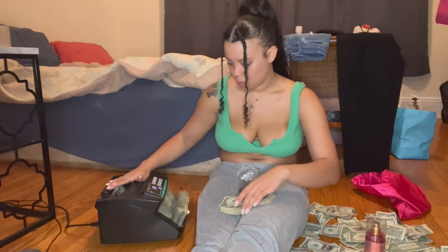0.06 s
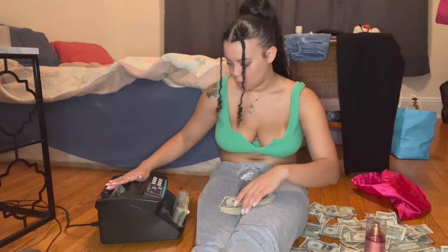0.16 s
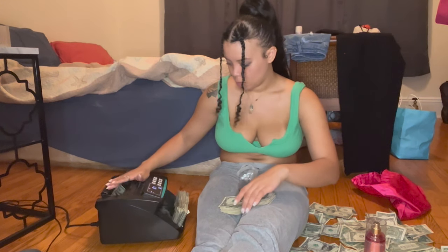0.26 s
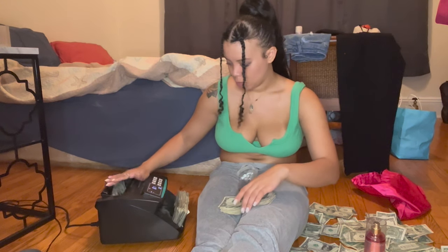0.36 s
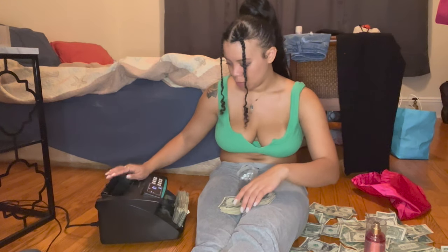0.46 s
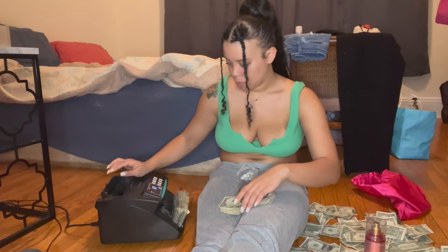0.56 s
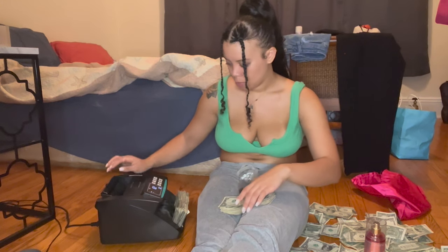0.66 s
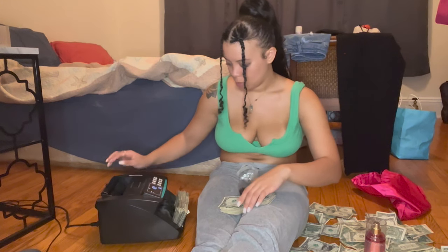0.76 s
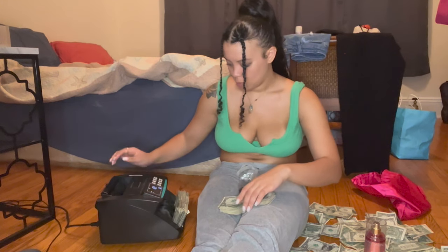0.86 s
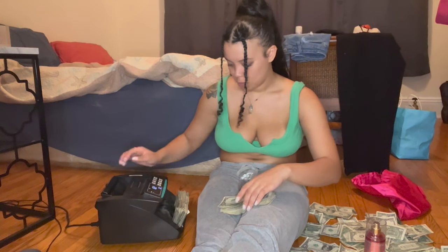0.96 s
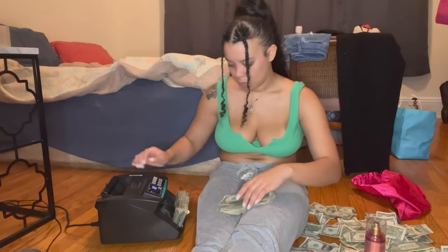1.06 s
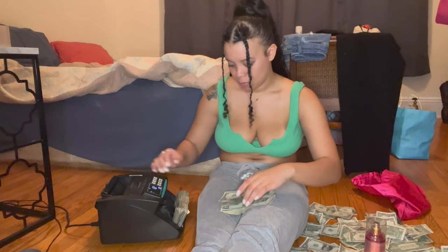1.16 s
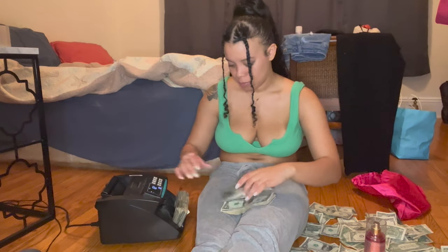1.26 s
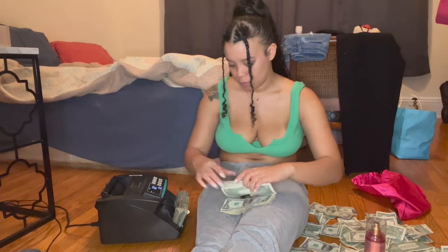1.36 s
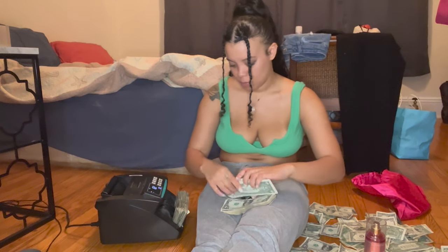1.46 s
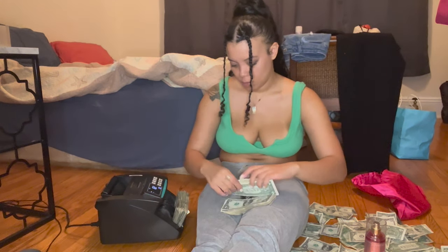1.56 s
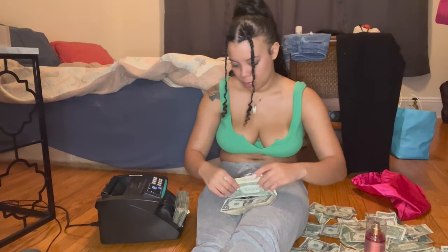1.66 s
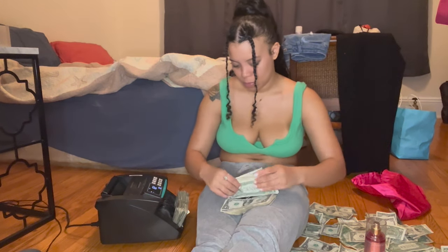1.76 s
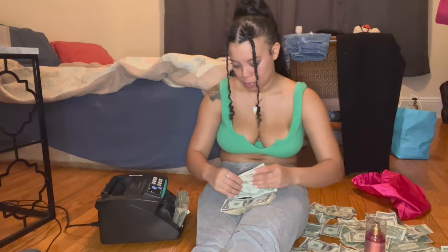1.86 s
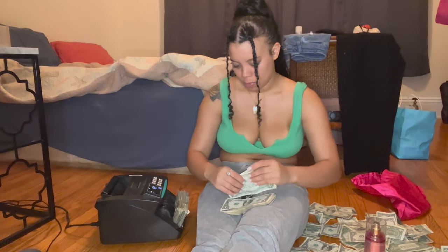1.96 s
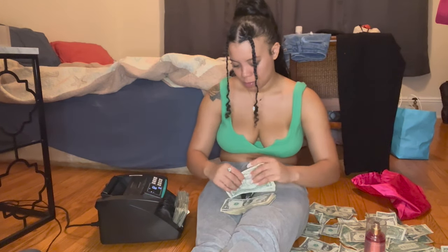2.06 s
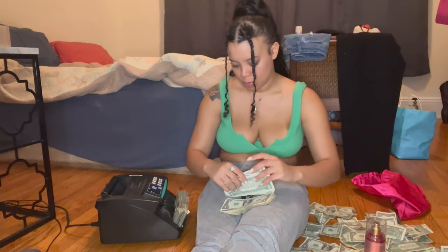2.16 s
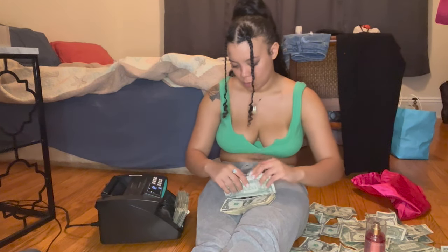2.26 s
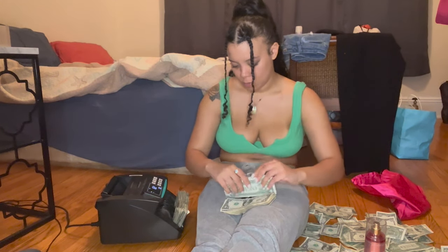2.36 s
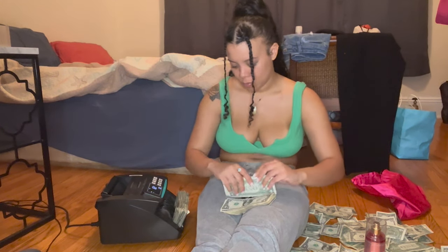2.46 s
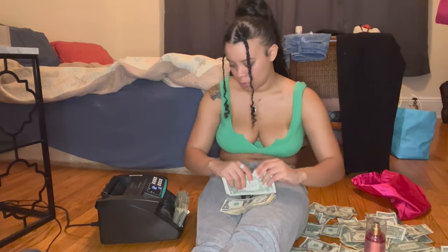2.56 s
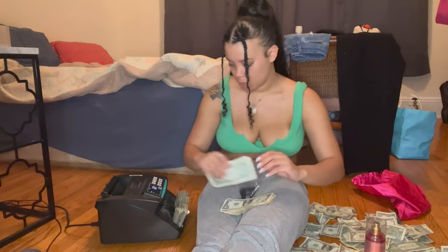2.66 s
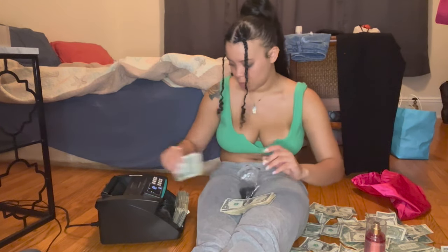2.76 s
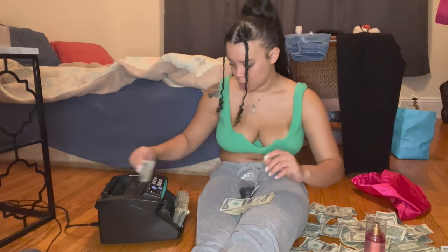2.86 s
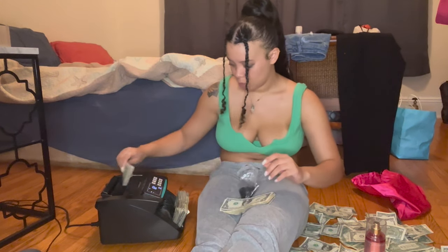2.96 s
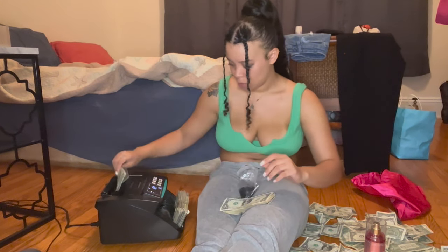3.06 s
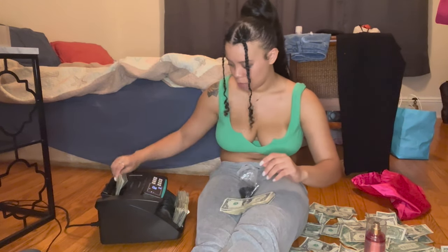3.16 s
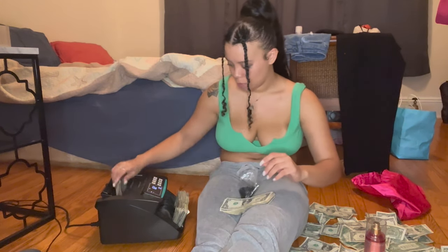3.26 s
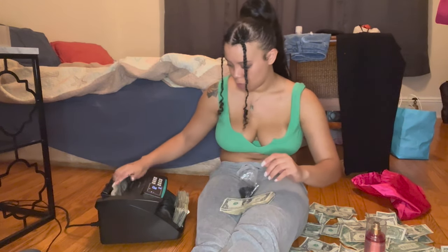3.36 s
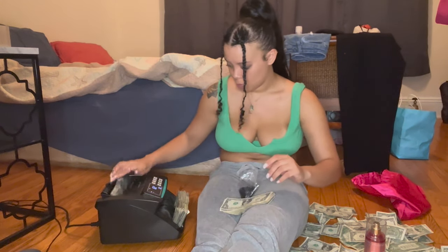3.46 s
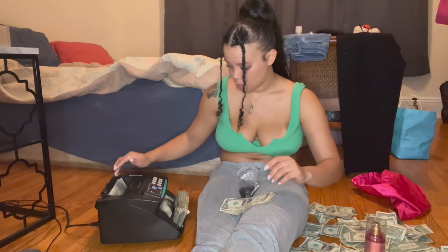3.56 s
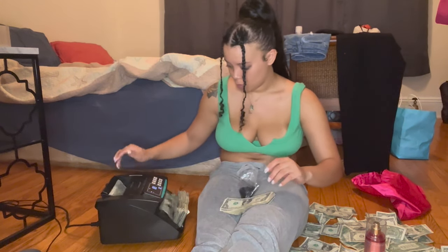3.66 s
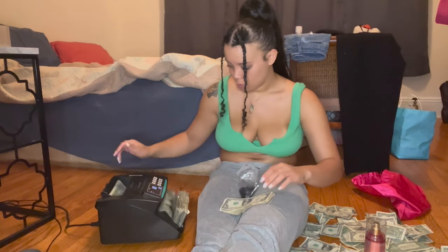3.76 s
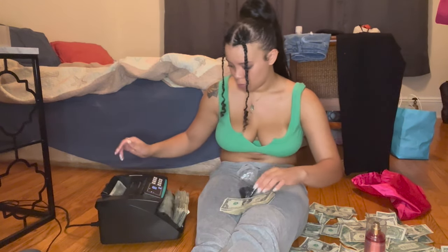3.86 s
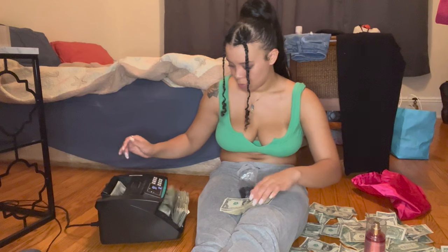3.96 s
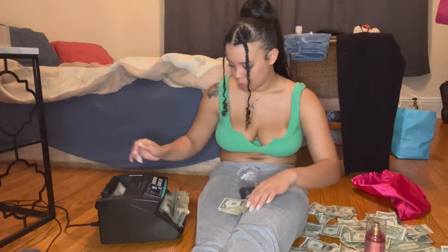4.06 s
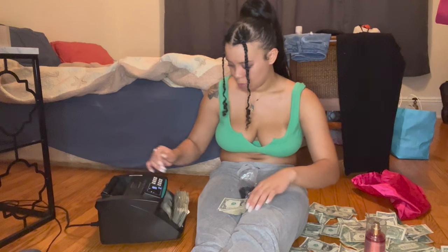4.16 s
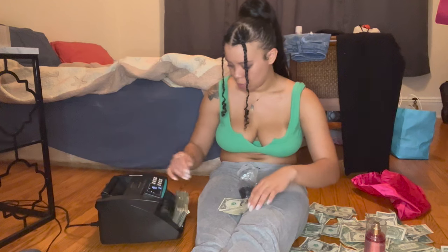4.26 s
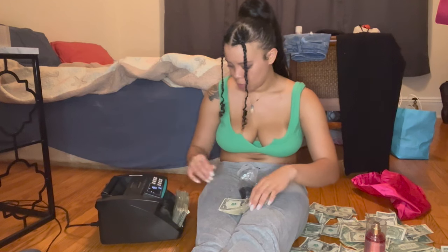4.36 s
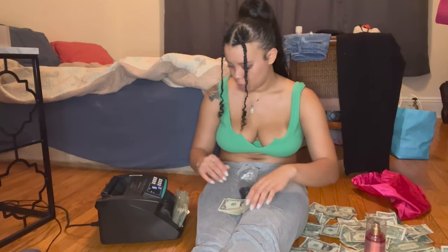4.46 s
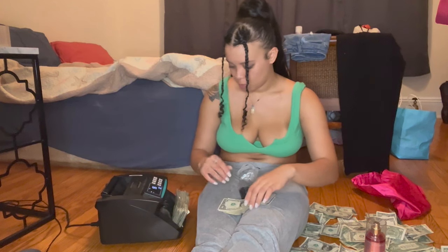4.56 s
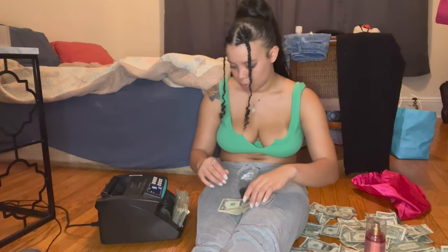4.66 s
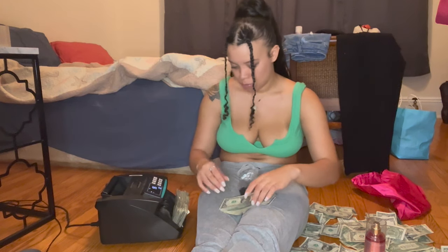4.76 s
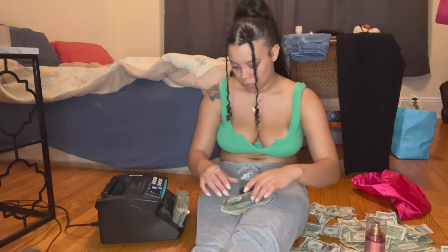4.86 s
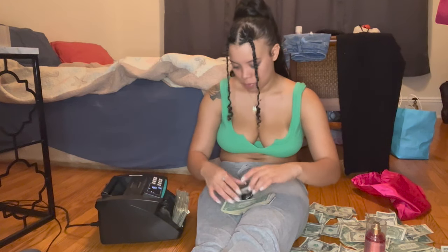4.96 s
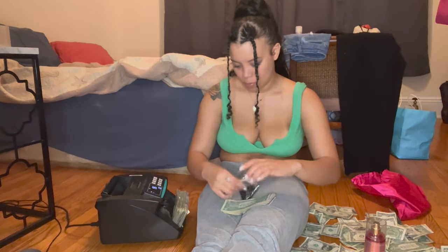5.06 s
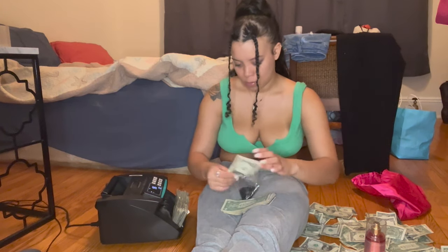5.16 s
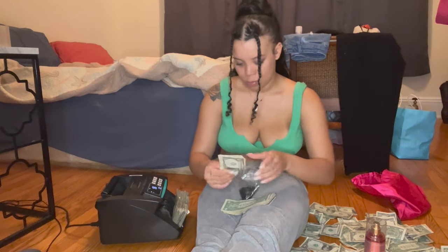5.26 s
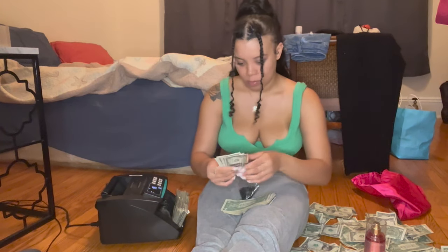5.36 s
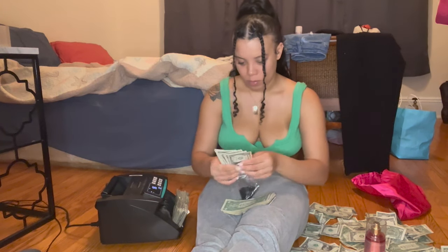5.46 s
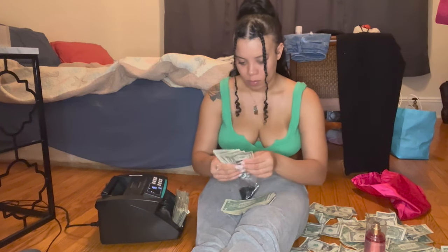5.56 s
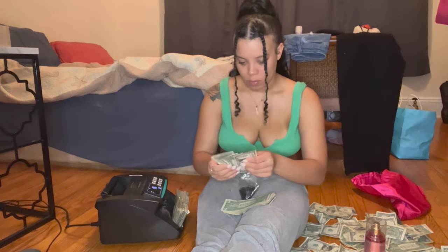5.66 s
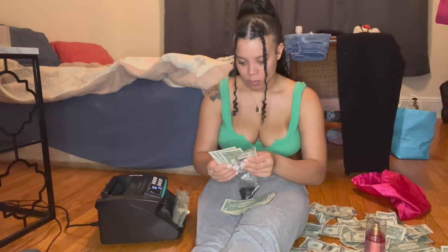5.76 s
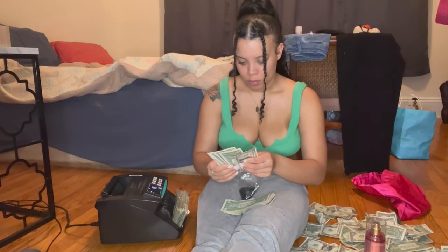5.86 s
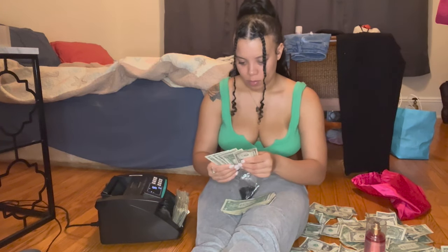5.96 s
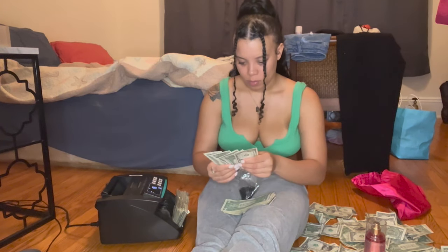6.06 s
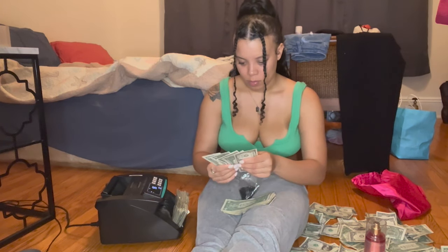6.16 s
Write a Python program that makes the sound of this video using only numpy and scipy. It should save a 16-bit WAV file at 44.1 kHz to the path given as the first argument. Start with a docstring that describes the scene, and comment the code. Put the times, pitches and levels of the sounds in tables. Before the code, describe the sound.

Close in a bedroom, a bill counting machine whirs in two short bursts, with soft paper rustles, crisp snaps and a hopper clack between them.

```python
"""A banknote counter, already running, hums and drones close by on a wooden bedroom floor.
Rollers flick notes through at about 22 a second as scrapes and snaps; a vaned stacker wheel flaps them.
After the brake, hands on the other side gather, square and fan notes: clumps of tiny slips and sharp pops.
The stack clacks in the hopper, the machine runs once more, and hands return over the low floor rumble."""
import sys
import numpy as np
from scipy import signal
from scipy.fft import rfft, irfft
from scipy.io import wavfile

SR = 44100
rng = np.random.default_rng(int(sys.argv[2]) if len(sys.argv) > 2 else 0)


def file_out(sig):
    """Save sig as 16-bit WAV at sys.argv[1]."""
    # one column per channel
    cols = np.atleast_2d(sig).T
    # limit, then scale
    lim = np.clip(cols, -1, 1)
    pcm = np.round(lim * 32767).astype(np.int16)
    wavfile.write(sys.argv[1], SR, pcm)


N = 274302
T = np.arange(N) / SR


def amp(db):
    """Decibels to gain."""
    return 10 ** (np.asarray(db) / 20)


def evened(x):
    """Scales to rms 1."""
    return x / np.sqrt(np.mean(x ** 2) + 1e-20)


def read(points, hz):
    """Reads a spectrum on a log-frequency axis."""
    f, value = np.transpose(points)
    return np.interp(np.log(hz + 1), np.log(f + 1), value)


def add(mix, s, sound):
    """Mixes a sound in at time s."""
    part = mix[max(round(s * SR), 0):][:len(sound)]
    part += sound[:len(part)]


def colour(x, points):
    """Causal minimum-phase filter of unit energy; its response stays level above 11 kHz."""
    hz = np.minimum(abs(np.fft.fftfreq(4096, 1 / SR)), 11000)
    log_gain = np.log(amp(read(points, hz)))
    response = np.exp(np.conj(signal.hilbert(log_gain)))
    taps = np.fft.ifft(response).real
    return signal.oaconvolve(x, taps / np.linalg.norm(taps))[:len(x)]


def wander(hz):
    """Slow chance of rms 1, mostly below the given rate."""
    lowpass = np.exp(-(np.fft.rfftfreq(N, 1 / SR) / hz) ** 2)
    return evened(irfft(rfft(rng.standard_normal(N)) * lowpass, N))


def crackle(per_s, spread_db):
    """Random clicks of either sign, many small and a few large, at rms 1."""
    size = amp(spread_db * np.minimum(rng.exponential(1, N), 4))
    sign = rng.choice([-1, 1], N)
    return evened(size * sign * (rng.random(N) < per_s / SR))


SWELL_CURVE = 1.37  # 1 = straight in dB, 2 = bell


def swell(start, stop, rise_s, fall_s):
    """Full level from start to stop; 20 dB lower rise_s before and fall_s after."""
    away = np.maximum(start - T, 0) / rise_s + np.maximum(T - stop, 0) / fall_s
    return amp(-20 * np.minimum(away ** SWELL_CURVE, 10))


def burst(length, hz, db):
    """A tone that swells and dies within the given seconds."""
    t = np.arange(int(length * SR)) / SR
    return amp(db) * np.hanning(len(t)) * np.sin(2 * np.pi * hz * t)


def ring(modes):
    """The free ringing of a struck part: decaying sines."""
    t = np.arange(SR // 3) / SR
    return sum(amp(db - 60 * t / t60) * np.sin(2 * np.pi * hz * t) for hz, db, t60 in modes)


# Decay of the bedroom. Each row: frequency in Hz, time to die by 60 dB in seconds.
ROOM_DECAY = [(150, 0.5), (600, 0.32), (2000, 0.28), (6000, 0.31), (12000, 0.22)]


def reflections(x):
    """Scattered echoes for two sides that die away band by band."""
    delay = np.arange(SR) / SR
    taps = rng.standard_normal((2, SR)) * (rng.random((2, SR)) < .08) * (delay > .003)
    hz, t, z = signal.stft(taps, SR, nperseg=256)
    decay = amp(-60 * t / read(ROOM_DECAY, hz)[:, None])
    tail = signal.istft(z * decay, SR, nperseg=256)[1]
    # floor and furniture answer first
    tail *= 1 + 1.5 * np.exp(-np.arange(tail.shape[1]) / SR / 0.008)
    return signal.fftconvolve(x[None], tail / np.linalg.norm(tail[0]), axes=1)[:, :N]


def room(x, wet_db, lag):
    """Direct sound, lag s later on the right, plus four echo patterns that trade places at 13 Hz."""
    wet = sum(reflections(x * np.cos(2 * np.pi * (13 * T + k / 8))) for k in range(4)) / np.sqrt(2)
    direct = np.array([x, np.interp(T - lag, T, x)])
    return (direct + amp(wet_db) * wet) / np.sqrt(1 + amp(wet_db) ** 2 / 2)


# Spectrum of the faint room tone. Each row: frequency in Hz, relative level in dB.
AIR_COLOUR = [(53, -36), (90, -7), (125, -1), (153, -7), (261, -9), (341, -13.5), (409, -15), (492, -21.5),
              (856, -23.5), (1610, -32), (2530, -34), (5630, -41.5), (12000, -36.5), (15600, -68),
              (22000, -120)]
# Spectrum of the floor rumble. Each row: frequency in Hz, relative level in dB.
RUMBLE_COLOUR = [(20, -33), (32, -22.5), (45, -2), (62, 4), (80, -5.5), (110, -13.5), (300, -56.5)]
# Weight shifting on the floor. Each row: from and to in seconds, rumble level in dB.
SHIFTS = [(1.422, 2.95, -68), (4.55, 5.27, -64.5), (5.52, 6.222, -69)]
AIR_DB = -68.5
RUMBLE_DB, SHAKE_DB, RUMBLE_WAVER_DB = -69.5, -61, 2  # the house alone; floor shaken by the machine
SHAKE_HOLD_S = 0.22  # the floor goes on shaking after the brake
SHIFT_FADE_S, SHAKE_RISE_S, SHAKE_FADE_S = 0.1, .15, .25


def air():
    """Uneven floor rumble, alike on both sides, stirred by machine and movement; separate room tone."""
    shake = sum(swell(start, brake + SHAKE_HOLD_S, SHAKE_RISE_S, SHAKE_FADE_S) for start, brake, *_ in RUNS)
    shake = amp(SHAKE_DB) * shake
    shifts = sum(amp(db) * swell(start, stop, SHIFT_FADE_S, SHIFT_FADE_S) for start, stop, db in SHIFTS)
    level = np.sqrt(amp(RUMBLE_DB) ** 2 + shake ** 2 + shifts ** 2)
    stirred = level * amp(RUMBLE_WAVER_DB * wander(hz=7.4))
    rumble = stirred * colour(rng.standard_normal(N), RUMBLE_COLOUR)
    sides = np.array([colour(rng.standard_normal(N), AIR_COLOUR) for _ in range(2)])
    return rumble + amp(AIR_DB) * sides * amp(1.0 * wander(hz=4.6))


CRINKLE_DB, CRINKLE_LOW_HZ, CRINKLE_HIGH_HZ = -9.5, 970, 5900  # level is relative to the rustle


def crinkles(rustle):
    """Tiny creases give way as notes slide, each ringing for a few cycles at one of eight pitches."""
    out = np.zeros(N)
    for hz in np.geomspace(CRINKLE_LOW_HZ, CRINKLE_HIGH_HZ, 8):
        cycles = hz * np.arange(SR // 100) / SR
        ping = evened(np.exp(-cycles / 2) * np.sin(2 * np.pi * cycles))
        out += signal.oaconvolve(crackle(per_s=25, spread_db=2.5), ping)[:N]
    return amp(CRINKLE_DB) * evened(out) * rustle


# Hands sliding over notes. Each row: loudest moment in seconds, rise in seconds, fall in seconds,
# rustle level in dB, dull flexing level in dB.
STROKES = [(1.38, .06, 0.048, -60, -69.5), (1.477, 0.0098, 0.082, -63.5, -61),
           (1.54, 0.047, 0.16, -68.5, -84.5), (1.765, 0.016, 0.046, -57, -64),
           (1.818, 0.02, 0.21, -59.5, -60.5), (1.967, 0.013, 0.036, -60.5, -61), (2.07, .07, .07, -69, -91),
           (2.29, 0.092, 0.056, -73.5, -90), (2.61, .06, 0.044, -73, -70), (2.64, .05, 0.045, -64.5, -89),
           (5.035, .005, 0.063, -67, -62.5), (5.112, 0.063, 0.045, -51.5, -61),
           (5.325, 0.03, 0.061, -72, -94), (5.446, 0.038, 0.054, -54, -58.5), (5.56, 0.044, 0.13, -68, -86),
           (5.655, 0.1, 0.049, -63, -66.5), (5.89, 0.18, 0.14, -68, -64), (6.032, 0.051, 0.049, -70, -60)]
# Spectrum of the sliding paper. Each row: frequency in Hz, relative level in dB.
RUSTLE_COLOUR = [(700, -4.5), (1800, -11), (3000, 0), (6000, -2), (9500, 3.5), (12000, -3.5)]
# Spectrum of the flexing sheets. Each row: frequency in Hz, relative level in dB.
FLEX_COLOUR = [(120, 6), (330, -0.5), (520, -8), (900, -2), (1300, -5.5), (1900, -7.5), (4000, -28.5),
               (10000, -31)]


def hands():
    """Notes slide over each other in clumps of tiny slips while the sheets flex."""
    rustle, flex = np.zeros((2, N))
    for s, rise_s, fall_s, rustle_db, flex_db in STROKES:
        stroke = swell(s, s, rise_s, fall_s)
        rustle += amp(rustle_db) * stroke
        flex += amp(flex_db) * stroke
    slips = crackle(per_s=3000, spread_db=1.5) * amp(2 * wander(hz=80.0)) * rustle
    bends = crackle(per_s=600, spread_db=0.5) * flex
    return colour(slips, RUSTLE_COLOUR) + colour(bends, FLEX_COLOUR) + crinkles(rustle)


# Handled notes buckling and tapping. Each row: start in seconds, relative level in dB,
# base pitch of the sheet in Hz, crispness (crack against pop) in dB.
SNAPS = [(1.375, -54.5, 950, -23), (1.402, -49.5, 1010, -28), (1.472, -51, 950, -10),
         (1.482, -67, 860, -16), (1.573, -59, 960, -28), (1.764, -56, 3320, -7), (1.775, -52.5, 1000, -11),
         (1.815, -48.5, 915, -1.5), (1.957, -61.5, 1110, 2), (5.035, -66, 1140, 2), (5.095, -55, 942, -12),
         (5.1189, -37, 1700, -3.5), (5.1197, -30, 5000, -20.5), (5.125, -44, 1720, -22),
         (5.133, -37, 1580, -17), (5.412, -59, 1640, -9), (5.451, -56, 810, -18), (5.547, -68, 2500, 1),
         (5.565, -78, 2500, -13), (5.999, -43, 1630, -16), (6.027, -44.5, 960, -23)]
# Spectrum of the crack. Each row: frequency in Hz, relative level in dB.
CRACK_COLOUR = [(150, -12), (330, 1.5), (520, -12.5), (1100, 4.5), (1800, -17), (2900, -3.5), (5500, -1),
                (7500, -2.5), (12000, -4.5)]


def snaps():
    """A buckling sheet gives one sharp crack, a short fizz of fibres and a pop that falls in pitch."""
    pops, cracks = np.zeros((2, N))
    t = np.arange(SR // 20) / SR
    # pitch over time: starts high, sinks below the base pitch as the sheet slackens
    slack = 1 + 0.45 * np.exp(-t / 0.00049) - 0.22 * (1 - np.exp(-t / 0.0054))
    for s, db, hz, crisp_db in SNAPS:
        cycles = np.cumsum(hz * slack) / SR
        add(pops, s, amp(db) * np.sin(2 * np.pi * cycles) * cycles * np.exp(1 - cycles))
        fizz = np.exp(-t / .006) * rng.standard_normal(len(t))
        crack = 4.5 * signal.unit_impulse(len(t), 40) + .45 * fizz
        add(cracks, s, amp(db + crisp_db) * crack)
    return amp(1.5) * pops + amp(12.0) * colour(cracks, CRACK_COLOUR)


# The stack landing and settling. Each row: start in seconds, clack in dB, thud of the case in dB,
# both before the strength of the modes and filter.
LANDINGS = [(3.268, -42.5, -66), (3.284, -46, -63), (3.296, -54, -58.5)]
# Spectrum of the clack. Each row: frequency in Hz, relative level in dB.
CLACK_COLOUR = [(500, -15.5), (800, -2), (1200, -10), (2000, -2), (4900, -4), (6500, -3), (12000, -13)]
# Modes of the hopper's plastic lip. Each row: frequency in Hz, relative level in dB, 60 dB decay in seconds.
LIP = [(1960, -10.5, 0.043), (2180, -15.5, 0.034), (3500, -4.5, 0.041), (4870, -14, 0.07)]
# Modes of the plastic case. Each row: frequency in Hz, relative level in dB, 60 dB decay in seconds.
CASE = [(135, -2.5, 0.21), (189, 1.5, .18), (270, -4.5, 0.31), (308, -0.5, 0.29), (810, 0, 0.15)]


def hopper():
    """The edge of the stack clacks on the plastic lip and the case thuds."""
    clack, knock = np.zeros((2, N))
    t = np.arange(SR // 10) / SR
    for s, clack_db, thud_db in LANDINGS:
        add(clack, s, amp(clack_db) * np.exp(-t / 0.014) * rng.standard_normal(len(t)))
        add(knock, s, amp(clack_db) * ring(LIP) + amp(thud_db) * ring(CASE))
    return amp(-4.5) * colour(clack, CLACK_COLOUR) + knock


# Whine of the stacker motor before the drive joins in. Each row: frequency in Hz, level in dB.
WHINE = [(200, -68), (830, -73.5)]
# Spectrum of the stacker noise. Each row: frequency in Hz, relative level in dB.
STACKER_COLOUR = [(290, -51), (500, -9), (594, -4.5), (765, 0.5), (947, -13), (1570, -7), (2100, -6),
                  (2310, -10), (2470, -12), (4030, -17.5), (7840, -20.5), (9320, -9.5), (12000, -12.5),
                  (15600, -51), (22000, -120)]
STACKER_DB, STACKER_LEAD_S, STACKER_RISE_S = -61.5, 0.27, .025  # starts ahead of the drive
RUN_DOWN_RISE_S, RUN_DOWN_FALL_S = 0.073, 0.23
WHIR_HZ, WHIR_DB = 2180, -12.5  # a whir of the motor, relative to its noise


def stacker():
    """The stacker wheel starts with a whine ahead of the drive, and whirs once more as it runs down."""
    spin, alone = np.zeros((2, N))
    for start, brake, off, *_, run_down_db in RUNS:
        alone += swell(start - STACKER_LEAD_S, start, STACKER_RISE_S, STOP_S)
        spin += amp(STACKER_DB) * swell(start - STACKER_LEAD_S, brake, STACKER_RISE_S, GEAR_FADE_S)
        spin += amp(run_down_db) * swell(off, off, RUN_DOWN_RISE_S, RUN_DOWN_FALL_S)
    whine = sum(amp(db) * np.sin(2 * np.pi * hz * T + 0.84 * wander(hz=20)) for hz, db in WHINE)
    whir = amp(WHIR_DB) * wander(hz=380) * np.sin(2 * np.pi * WHIR_HZ * T)
    noise = colour(crackle(per_s=8900, spread_db=6), STACKER_COLOUR)
    return alone * whine + spin * (whir + noise)


# Runs of the drive. Each row: up to speed at in seconds, brake in seconds, stacker off in seconds,
# mean roller pitch in Hz, roller drone in dB, gear rattle in dB, brake shudder in dB, stacker run-down in dB.
RUNS = [(-0.184, 0.594, 0.763, 262.9, -38, -43.5, -39.5, -60.5),
        (3.568, 4.235, 4.38, 268, -39.5, -42, -47.5, -57)]


def roller_turns():
    """Cycles of the roller drone, its pitch wavering slightly; twelve of them carry one note."""
    knots = [(s, hz) for start, _, off, hz, *_ in RUNS for s in (start, off)]
    s, hz = np.transpose(knots)
    return np.cumsum(np.interp(T, s, hz) * (1 + 0.012 * wander(hz=15))) / SR


SPIN_UP_S, COAST_S, STOP_S = 0.078, 0.16, .04  # the rollers coast on after the brake, then stop
GEAR_FADE_S, GEAR_LOAD_DB = 0.21, 2.5  # gears quieten as they slow, and rattle harder while notes pass
HUM_DB, HUM_HOLD_S, HUM_FADE_S = -47, 0.1, 0.027  # the motor hums on briefly under the brake
THROB_HZ, THROB_DB = 6.8, 1.5  # the roller drone throbs slowly


def drive():
    """Levels of motor hum, roller drone and gear rattle: each run spins up, holds, brakes and coasts."""
    hum, drone, gears = np.zeros((3, N))
    load = sum(swell(first, last, FLAP_RISE_S, FLAP_FALL_S) for first, last, *_ in BATCHES)
    for start, brake, _, _, drone_db, gear_db, _, _ in RUNS:
        turning = swell(start, brake + COAST_S, SPIN_UP_S, STOP_S)
        slowing = swell(start, brake, SPIN_UP_S, GEAR_FADE_S)
        throb_db = THROB_DB * np.sin(2 * np.pi * THROB_HZ * (T - start))
        hum += amp(HUM_DB) * swell(start, brake + HUM_HOLD_S, SPIN_UP_S, HUM_FADE_S)
        drone += amp(drone_db + throb_db) * turning
        gears += amp(gear_db + GEAR_LOAD_DB * load) * np.minimum(turning, slowing)
    return hum, drone, gears


# Steady tones of the motor. Each row: frequency in Hz, level in dB relative to the hum.
HUM = [(96.5, -3), (120, 2)]
# Tones of the gear train. Each row: multiple of the roller pitch, relative level in dB.
GEAR_TONES = [(.75, -4), (1.27, 2.5), (1.34, -1.5), (1.401, -2.5), (1.841, -15.5), (2.31, -12.5)]
GEAR_TONES_DB = -6  # relative to the rattle
SHUDDER_S, SHUDDER_HZ = .105, 89.1  # the brake makes the case shudder


def motor(turns, hum_level, drone_level, gear_level):
    """Motor hum, roller drone, wavering gear tones and the shudder of the brake."""
    shudder, out = np.zeros(N), []
    sway = .3 * wander(hz=25)
    for _, brake, *_, shudder_db, _ in RUNS:
        add(shudder, brake, burst(SHUDDER_S, SHUDDER_HZ, shudder_db))
    for offset in (0, .9):  # radians: standing waves reach the two sides out of step
        hum = sum(amp(db) * np.sin(2 * np.pi * hz * T + sway + 0.34 * offset) for hz, db in HUM)
        drone = np.sin(2 * np.pi * turns + offset) * (1 + 0.064 * wander(hz=30))
        gears = sum(amp(db) * np.sin(2 * np.pi * k * turns + offset + 0.88 * wander(hz=5.9))
                    for k, db in GEAR_TONES)
        tones = hum_level * hum + drone_level * drone + amp(GEAR_TONES_DB) * gear_level * gears
        out.append(tones + shudder)
    return np.array(out)


# Spectrum of the gear rattle. Each row: frequency in Hz, relative level in dB.
GEAR_COLOUR = [(50, -34), (88, -18.5), (150, -16), (215, -22.5), (260, 0), (307, -19), (355, -9),
               (551, -29), (604, -22.5), (662, -32.5), (1070, -27), (1630, -43), (2100, -37.5),
               (2530, -42.5), (12000, -56), (15600, -86), (22000, -120)]


def rattle(turns, gear_level):
    """Gear teeth chatter in the plastic case, stronger and weaker with each roller cycle."""
    teeth = crackle(per_s=6000, spread_db=3.0) * (1 + .5 * np.cos(2 * np.pi * turns))
    return gear_level * colour(teeth, GEAR_COLOUR)


# Tones in the stacker's clatter, near multiples of its vane rate.
# Each row: frequency in Hz, relative level in dB.
VANE_TONES = [(371.4, -48.5), (522.2, -54.5), (597.5, -54), (742.9, -55.5), (823.6, -51), (899.0, -51),
              (1034, -55), (1104, -61), (1179, -56), (1314, -54.5), (1464, -57.5)]


def vanes(flap_level):
    """The regular beat of the vanes gives the clatter a wavering, buzzy pitch."""
    out = np.zeros((2, N))
    for hz, db in VANE_TONES:
        phase = 2 * np.pi * hz * T + 0.33 * wander(hz=24.84)
        apart = rng.uniform(-0.53, 1.0)  # radians: each tone reaches the two sides out of step
        out += amp(db + 4.6 * wander(hz=30)) * np.sin([phase + apart, phase - apart])
    return amp(-2.5) * evened(out) * flap_level


# Batches of notes. Each row: first note in seconds, last note in seconds, paper scrape in dB,
# flapping in the stacker in dB, edge snap in dB before filter and strength spread.
BATCHES = [(-0.024, 0.062, -41, -37.5, -34.5), (0.439, 0.499, -39, -37.5, -32),
           (3.513, 4.141, -37.5, -38, -28.5)]
FLAP_LAG_S, FLAP_HOLD_S, FLAP_RISE_S, FLAP_FALL_S = 0.029, 0.01, 0.042, 0.025


def flapping():
    """Level of the notes flapping in the stacker, just behind the rollers."""
    return sum(amp(db) * swell(first + FLAP_LAG_S, last + FLAP_HOLD_S, FLAP_RISE_S, FLAP_FALL_S)
               for first, last, _, db, _ in BATCHES)


# Spectrum of scrapes and snaps at the rollers. Each row: frequency in Hz, relative level in dB.
SCRAPE_COLOUR = [(500, -16.5), (1500, -4), (2500, -2.5), (4500, 0), (7000, -2.5), (9500, -0.5), (12000, -6)]
# Spectrum of flapping sheets. Each row: frequency in Hz, relative level in dB.
FLAP_COLOUR = [(150, -17), (210, -5), (295, -9.5), (340, 6), (425, 4.5), (560, -9.5), (680, -4), (800, 0),
               (1150, -7), (1550, -5.5), (2300, -12.5), (4000, -25.5), (10000, -46)]
# A rubber roller squeaks as it grabs a late note. The row: start in seconds, length in seconds,
# pitch in Hz, level in dB.
SQUEAK = (.416, .012, 4450, -39.5)
NOTE_S, NOTE_SPREAD_DB = .045, 5.5  # time from note to note; how much the notes differ
SCRAPE_LEAD_S, SCRAPE_RISE_S, SCRAPE_FALL_S, SCRAPE_ROUGH_DB = 0.0064, 0.034, 0.02, 3.4
FIRST_SOFTER, TAKE_UP_S = 0.8, 0.047  # the first notes of a batch go through more gently
EDGE_FLAP_DB = -3.5  # share of an edge snap that shakes the whole sheet
VANE_HZ = 74.6  # vanes of the stacker wheel pass this many times a second


def feed(turns, flap_level):
    """Each note scrapes between the rollers, snaps free and is slapped by the stacker's vanes."""
    scrape_level, edges, squeak = np.zeros((3, N))
    t = np.arange(SR // 20) / SR
    for first, last, scrape_db, _, edge_db in BATCHES:
        passing = swell(first - SCRAPE_LEAD_S, last, SCRAPE_RISE_S, SCRAPE_FALL_S)
        scrape_level += amp(scrape_db) * passing
        times = np.linspace(first, last, round((last - first) / NOTE_S) + 1)
        for s in times[times > 0]:
            take_up = 1 - FIRST_SOFTER * np.exp((first - s) / TAKE_UP_S)
            strength = amp(edge_db + NOTE_SPREAD_DB * rng.uniform(-1.2, 1)) * take_up
            add(edges, s, strength * np.exp(-t / 0.0034) * rng.standard_normal(len(t)))
    note = 2 * np.pi * turns / 12
    vane = np.cos(2 * np.pi * VANE_HZ * T + 0.34 * wander(hz=44))
    roughness = amp(SCRAPE_ROUGH_DB * wander(hz=118))
    scrape = crackle(per_s=9900, spread_db=2.5) * roughness * scrape_level
    # two beats per note, the vane beat and chance
    flutter = amp(3.5 * np.cos(2 * note) + 6 * vane + 2.4 * wander(hz=100))
    flap = crackle(per_s=3300, spread_db=1.0) * flutter * flap_level
    add(squeak, SQUEAK[0], burst(*SQUEAK[1:]))
    at_rollers = colour(scrape + edges, SCRAPE_COLOUR)
    in_stacker = colour(flap + amp(EDGE_FLAP_DB) * edges, FLAP_COLOUR)
    return at_rollers + in_stacker + squeak


def scene():
    """The machine stands slightly to one side; the hands, on the other side, sound drier."""
    turns, flap_level = roller_turns(), flapping()
    hum_level, drone_level, gear_level = drive()
    paper = room(hands() + snaps(), wet_db=-1.5, lag=-.00006)
    clatter = feed(turns, flap_level) + rattle(turns, gear_level) + stacker() + hopper()
    tones = motor(turns, hum_level, drone_level, gear_level) + vanes(flap_level)
    machine = tones + room(clatter, wet_db=0.0, lag=0.000032)
    return machine + paper + air()


# Gain of the sum of the two sides. Each row: frequency in Hz, gain in dB.
SUM_GAIN = [(20, -14.5), (42, -0.5), (12400, -1.5), (13200, -25.5), (14000, -44.5)]
# Gain of the difference of the two sides. Each row: frequency in Hz, gain in dB.
DIFFERENCE_GAIN = [(70, -3), (150, -9), (350, 0), (2000, -0.5), (5000, 1.5), (7400, -1), (9000, -16),
                   (10300, -20.5), (11800, -10), (13500, 4.5), (15500, -13)]
# Balance of the two sides. Each row: frequency in Hz, left minus right gain in dB.
TILT = [(60, -4), (110, -0.5), (200, -4.5), (350, -1.5), (640, 1), (1150, -0.5), (2070, 0), (3740, -1),
        (6760, -3), (12200, 0.0)]
EDGE_HZ = 15750  # upper band limit


def record(dry):
    """The stereo width and balance change with frequency; then the band limit."""
    hz = np.fft.rfftfreq(N, 1 / SR)
    left, right = rfft(dry)
    mid = (left + right) / 2 * amp(read(SUM_GAIN, hz))
    side = (left - right) / 2 * amp(read(DIFFERENCE_GAIN, hz))
    lean = amp(read(TILT, hz) / 2)
    out = irfft(np.array([(mid + side) * lean, (mid - side) / lean]), N)
    lowpass = signal.firwin(511, EDGE_HZ, window=("kaiser", 9), fs=SR)
    return signal.oaconvolve(out, lowpass[None], "same")


dry = scene()
out = record(dry)
file_out(out)
```